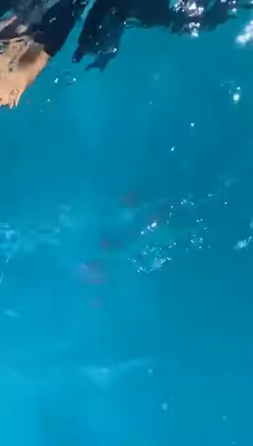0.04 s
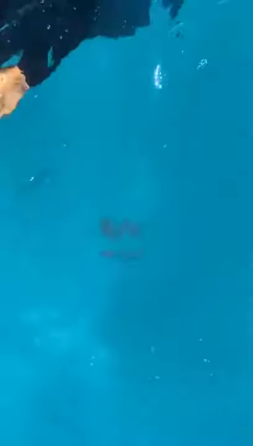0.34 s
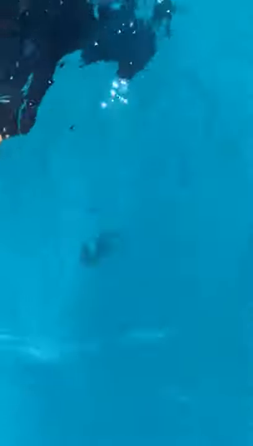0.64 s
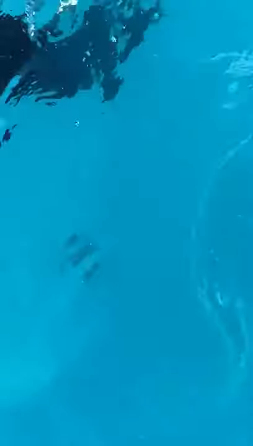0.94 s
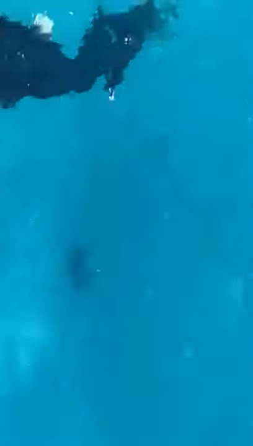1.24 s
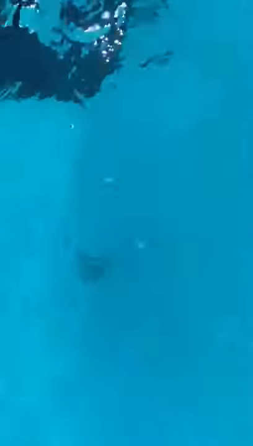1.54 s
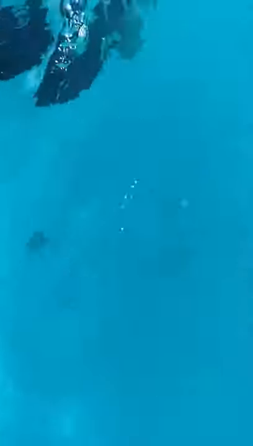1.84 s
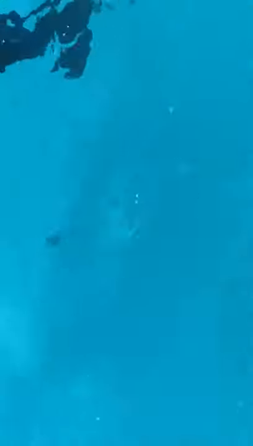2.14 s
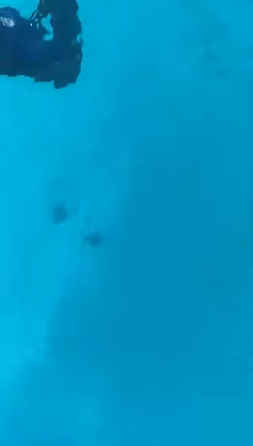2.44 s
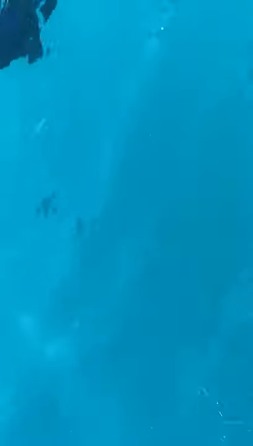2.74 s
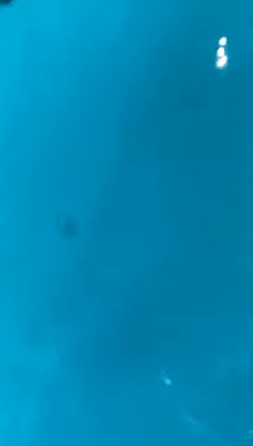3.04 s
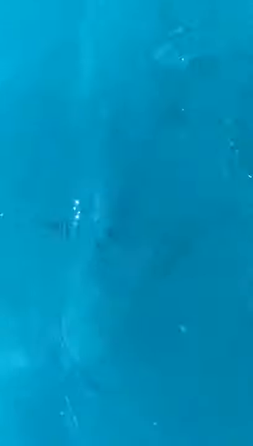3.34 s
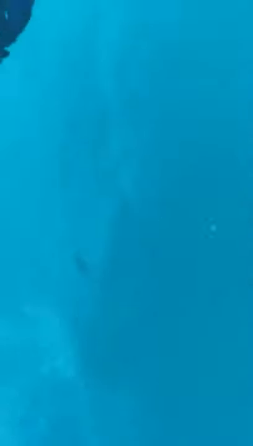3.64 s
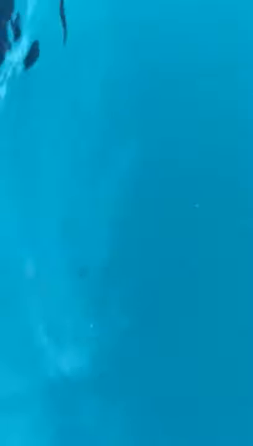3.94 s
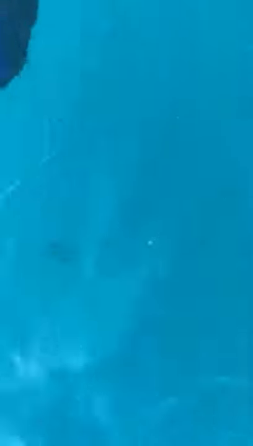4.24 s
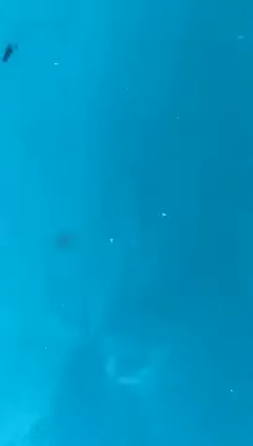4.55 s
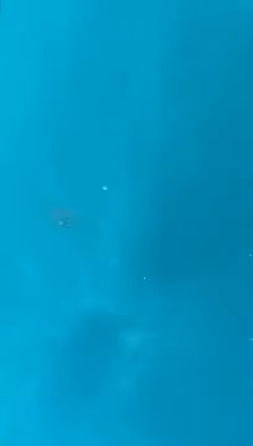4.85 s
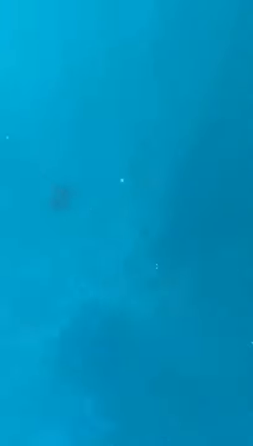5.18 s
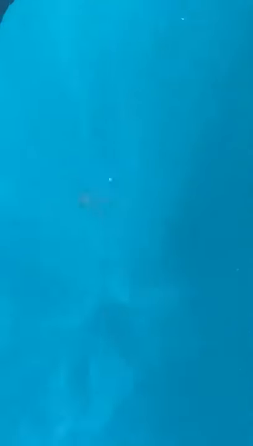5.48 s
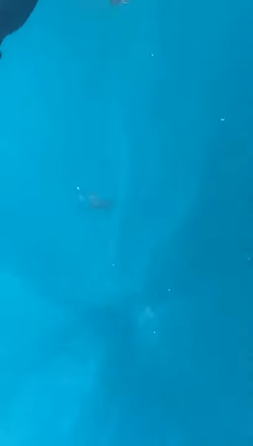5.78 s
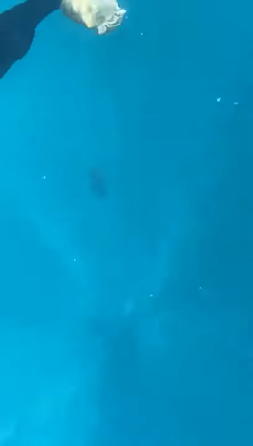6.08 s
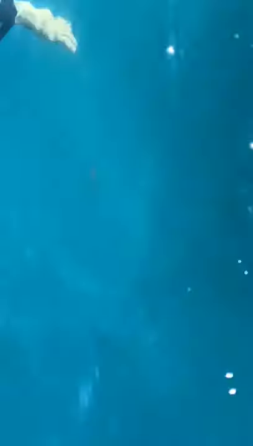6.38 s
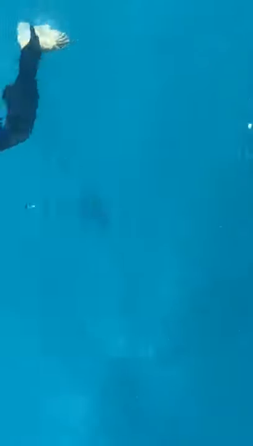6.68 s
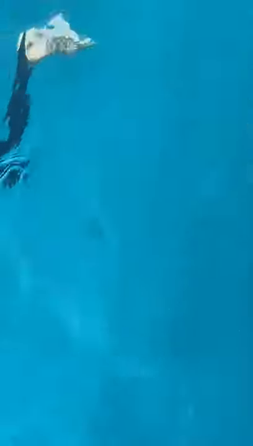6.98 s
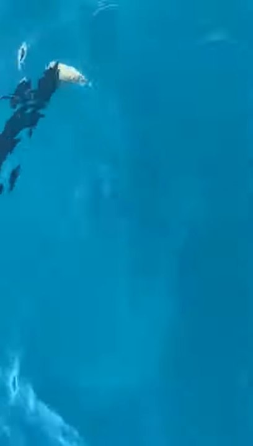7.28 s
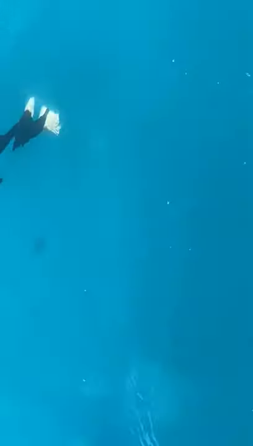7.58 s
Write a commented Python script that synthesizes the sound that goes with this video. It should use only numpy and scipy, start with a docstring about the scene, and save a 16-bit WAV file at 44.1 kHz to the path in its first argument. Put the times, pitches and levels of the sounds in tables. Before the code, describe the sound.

Sea water laps, plops and splashes against a small boat while wind rumbles and thumps on the microphone.

```python
"""Sea water laps at the side of a small boat while wind buffets the microphone.
Each wave folds a cloud of air bubbles under, throws spray and leaves foam that fizzes and crackles
as it dies away. Single bubbles plop and thrown water slaps back on the surface, over a soft wash
and steady low lapping under the hull. Turbulence at the two microphone ports rumbles and thumps;
the hull adds a short, dull reflection."""
import sys
import numpy as np
from scipy import signal
from scipy.fft import rfft, irfft, next_fast_len
from scipy.io import wavfile
from scipy.ndimage import uniform_filter1d

SR = 44100
rng = np.random.default_rng(int(sys.argv[2]) if len(sys.argv) > 2 else 0)


def inscribe(sig):
    """Save sig as 16-bit PCM at rate SR to the path in sys.argv[1].

    A 1-D sig is mono; a 2-D sig holds one channel per row.
    Samples are clipped to [-1, 1] before scaling.
    """
    pcm = np.round(np.clip(np.atleast_2d(sig).T, -1, 1) * 32767)
    wavfile.write(sys.argv[1], SR, pcm.astype(np.int16))


N = 344862

# waves folding against the hull: start_s, length_s, churn_db, small_bubbles_db, spray_db, pitch_hz
WAVE_HITS = [(-.07, 0.33, -46.5, -44.5, -45.5, 1470), (0.038, .14, -25.5, -60, -87, 420),
             (0.598, 0.083, -34.5, -41.5, -48, 590), (0.908, 0.061, -50, -60, -43, 903),
             (1.024, 0.036, -35, -43, -38, 1420), (2.017, 0.15, -52, -62, -51, 855),
             (3.415, 0.12, -25.5, -34.5, -40.5, 456), (3.644, .16, -42, -48, -46.5, 710),
             (3.934, 0.21, -51.5, -51.5, -50, 890), (4.628, 0.088, -63, -44.5, -46.5, 1100),
             (4.707, 0.3, -50.5, -58.5, -58.5, 1640), (6.003, 0.08, -32, -37.5, -39, 453),
             (6.078, 0.079, -33.5, -42.5, -46.5, 1285), (6.16, 0.24, -49.5, -50.5, -54.5, 1266),
             (6.38, 0.068, -52, -45.5, -46.5, 1900), (7.035, 0.081, -61, -49, -43.5, 1500),
             (7.35, 0.12, -38, -43.5, -46.5, 610)]
# thrown water hitting the surface: hit_s, level_db, t60_s, colour_hz
SLAP_HITS = [(0.248, -27.5, 0.064, 2370), (.311, -28.5, 0.043, 2670), (0.571, -21, .014, 6260),
             (.605, -24, 0.012, 2600), (.902, -22, 0.017, 3790), (.938, -13, 0.017, 5200),
             (1.035, -13, 0.011, 3260), (1.171, -26.5, 0.027, 8100), (3.549, -25, .014, 3840),
             (3.679, -25, 0.025, 3350), (3.734, -26.5, 0.025, 3460), (4.156, -18.5, 0.0043, 8040),
             (4.35, -11, 0.007, 6820), (4.446, -27, 0.084, 3530), (5.01, -32.5, 0.02, 3900),
             (6.348, -24, 0.094, 3050), (7.117, -23, .018, 4680), (7.155, -26, 0.036, 2850),
             (7.287, -17, 0.011, 7260)]
# bright EQ of spray and foam: frequency_hz, gain_db
SPRAY_EQ = [(900, -31), (1800, 6), (2700, 5), (4000, 4.5), (5300, 1.5), (6500, 2), (8000, -3), (10000, 3.5),
            (12000, -6)]

CALM_FIZZ_DB = -62  # hiss of calm water, on which the foam builds
PATTER_DB = 3  # depth of the fast flutter in slaps and foam


def waves():
    """A wave folds big bubbles under in glugs that climb as the air breaks up; small ones and spray follow."""
    glug_db, glide_octaves = 2.2, 0.48  # depth of the flutter; climb over a wave's length
    small_bubble_eq = [(600, -17), (1000, 2), (1500, 7.5), (2150, -2.5), (3500, -8.5)]  # frequency_hz, gain_db
    out, t = np.zeros((2, N)), np.arange(N) / SR
    gurgle = bubble_cloud(295.7, 3700, per_s=2800, cycles=21, rise=0.321, pitches=48)
    gurgle = stereo(gurgle + amp(-12) * noise_pair(), side=0.077)
    small = equalise(gurgle, small_bubble_eq)
    spray = stereo(equalise(fine_bubbles() + noise_pair(), SPRAY_EQ), side=0.067)
    spray = unit_rms(spray * amp(glug_db * wobble(size=90)))  # spray lands in separate spatters
    glugs = amp(glug_db * wobble(size=220))
    for start, length, churn_db, small_db, spray_db, hz in WAVE_HITS:
        span = slice(max(int(start * SR), 0), int((start + 2 * length) * SR))
        age = np.maximum(t[span] - start, 0) / length
        sweep_hz = hz * 2 ** (glide_octaves * (age - .5))
        large = levelled(swept_band(gurgle[:, span], sweep_hz, half_width_hz=0.65 * hz), size=1500)
        splash = amp(spray_db) * spray[:, span] + amp(small_db) * small[:, span]
        fold = (1 - np.exp(-age / 0.15)) * np.exp(-age ** 2.4)
        throw = (1 - np.exp(-(age / 0.36) ** 2)) * np.exp(-(age / 0.86) ** 3.7)
        out[:, span] += amp(churn_db + 1) * fold * large + amp(5) * throw * splash
    return out * glugs


def plops():
    """A big bubble ticks as its neck pinches off, rings with a wobble and sheds two smaller bubbles."""
    # single bubbles by the boat: start_s, pitch_hz, level_db, ring_cycles, rise_share
    big_bubbles = [(0.652, 1840, -24.5, 45, 0.24), (0.67, 1012, -17, 55, -0.064),
                   (.752, 2930, -30, 38, 0.45), (0.973, 1615, -23, 21, 0), (1.033, 1610, -11.5, 8, 1),
                   (1.292, 4370, -31, 48, -0.12), (2.109, 2550, -29, 36, 0.031),
                   (2.268, 560, -19, 18, 0.18), (2.492, 1710, -25.5, 9.2, 0.034),
                   (2.578, 2920, -23.5, 12, 0.16), (2.625, 2970, -28.5, 35, 0.1),
                   (3.464, 1353, -25, 79, 0.13), (3.576, 510, -19, 17.5, 0.74),
                   (3.726, 1125, -25.5, 43, 0.4), (4.149, 2140, -26, 40, 0.54),
                   (4.348, 1516, -21.5, 24, 0.33), (4.667, 1297, -19.5, 33, 0.45),
                   (4.98, 1970, -30.5, 34, 0.25), (5.7, 1464, -33, 41, 0.067), (6.132, 734, -18, 28, 0.36),
                   (6.434, 2750, -30, 50, 0.36), (6.978, 2290, -24, 29, 0.13),
                   (7.156, 1140, -12.5, 5.3, 0.36), (7.280, 745, -24.5, 32, 1.35),
                   (7.32, 2295, -28.5, 68, 0.27)]
    shed_db, shed_octaves, shed_within_s = -14, 1.6, .03
    out = np.zeros((2, N))
    for (start, hz, db, cycles, rise), pan_db in zip(big_bubbles, rng.uniform(-1, 1, len(big_bubbles))):
        gain = amp(db + pan_db * np.array([[1], [-1]]))
        ring = bubble(hz, cycles / hz, rise)
        ring *= amp(2.2 * wobble(size=70, count=len(ring)))
        t = np.arange(len(ring)) / SR
        tick_db = -10.5 + 5.5 * np.log2(hz / 1960)  # smaller bubbles tick harder
        tick = amp(tick_db) * rng.standard_normal(len(t)) * np.exp(-t / 0.0019)
        add(out, start, gain * (ring + tick))
        for late, smaller in rng.random((2, 2)):
            shed_hz = hz * 2 ** (shed_octaves * smaller)
            shed = bubble(shed_hz, cycles / shed_hz, rise / 2)
            add(out, start + shed_within_s * late, gain * amp(shed_db) * shed)
    return out


def slaps():
    """Thrown water lands: a quick swell to one sharp crack, then an uneven patter of droplets."""
    out, t = np.zeros((2, N)), np.arange(-600, 3500) / SR
    for hit, db, t60, hz in SLAP_HITS:
        clumps = amp(PATTER_DB * wobble(size=40, count=len(t)))
        droplets = noise_pair(len(t)) * amp(0.44 * rng.standard_normal(len(t)))
        band = signal.butter(1, [hz / 1.9, min(hz * 1.33, SR / 2.5)], "band", fs=SR)
        patter = stereo(signal.lfilter(*band, droplets), side=0.2)
        envelope = np.exp(-np.log(1000) * np.maximum(t, -2.6 * t) / t60)
        crack = np.exp(-((t - .0005) / 0.00029) ** 2)
        add(out, hit + t[0], amp(db - 6) * patter * (envelope * clumps + crack))
    return out


def bubble(hz, t60, rise):
    """Trapped air rings down, its pitch gliding by the share `rise` over t60 as it nears the surface."""
    t = np.arange(int(t60 * SR) + 8) / SR
    turns = hz * (t + rise * t ** 2 / (2 * t60))
    attack = 1 - np.exp(-.7 * hz * t)
    decay = np.exp(-np.log(1000) * (t / t60) ** 1.64)
    return np.sin(2 * np.pi * turns) * decay * attack


def bubble_cloud(low_hz, high_hz, per_s, cycles, rise, pitches):
    """Bubbles of many sizes ring at random times, about per_s a second in each channel."""
    spread_db, candidates = 4, 3000
    birth_chance = 2 * per_s * N / SR / pitches / candidates
    out = np.zeros((2, N))
    for hz in np.geomspace(low_hz, high_hz, pitches):
        ring = bubble(hz, cycles / hz * rng.uniform(0.17, 3.07), rise * rng.uniform(0.33, 2.22))
        when, channel, size, draw = rng.random((4, candidates))
        strength = amp(spread_db * np.minimum(-np.log(size), 4)) * rng.choice([-1, 1], candidates)
        births = np.zeros((2, N))
        births[(2 * channel).astype(int), (when * N).astype(int)] = strength * (draw < birth_chance)
        out += signal.oaconvolve(births, hz * ring[None], axes=1)[:, :N]
    return unit_rms(out)


def fine_bubbles():
    """The dense, wet chatter of the smallest bubbles in spray and foam."""
    return bubble_cloud(1510, 6520, per_s=1800, cycles=14, rise=0.16, pitches=40)


def foam_envelope():
    """How much foam lies on the water, 1 when calm: each wave and slap leaves a patch that dies away."""
    rise_db_per_s, fade_db_per_s = 90, 40.5
    t, power = np.arange(N) / SR, np.ones(N)
    # a patch scales with the energy of the spray or slap: peak_s, level_db
    patches = [(start + length, spray_db + 1.5 + 10 * np.log10(length))
               for start, length, _, _, spray_db, _ in WAVE_HITS]
    patches += [(hit, db - 18 + 10 * np.log10(t60)) for hit, db, t60, _ in SLAP_HITS]
    for peak, db in patches:
        below_peak_db = np.maximum(rise_db_per_s * (peak - t), fade_db_per_s * (t - peak))
        power += amp(db - CALM_FIZZ_DB - below_peak_db) ** 2
    return np.sqrt(power)


def crackle(foam):
    """Droplets tick without a pitch: a few loud ones, and faint ones that thicken and grow with the foam."""
    # the loudest droplets on the surface: start_s, level_db
    loud_drops = [(.7, -20), (1.011, -23), (1.114, -20), (2.063, -26), (2.185, -29), (2.634, -31),
                  (1.848, -28), (3.395, -26), (4.568, -23), (6.836, -31.5)]
    calm_per_s, t60_s = 17, .006
    out, t = np.zeros((2, N)), np.arange(256) / SR
    births = np.flatnonzero(rng.random(N) < calm_per_s * foam / SR)
    faint_db = -55.5 + 17 * np.log10(foam)
    faint_drops = [(i / SR, faint_db[i] + 5 * min(rng.exponential(), 3)) for i in births]
    for start, db in list(loud_drops) + faint_drops:
        add(out, start, amp(db - 60 * t / t60_s) * rng.standard_normal(len(t)))
    return signal.lfilter(*signal.butter(1, [3800, 12000], "band", fs=SR), out)


def wind_and_low_lapping():
    """Turbulence at the ports rumbles, buffets and thumps, over steady low lapping under the hull."""
    # wind strength at the microphone: time_s, level_db
    wind_curve = [(0.0, -40.5), (2.41, -24), (2.44, -23.5), (2.52, -28.5), (4.2, -29), (4.4, -22.5),
                  (5.07, -26), (5.339, -19), (5.441, -34), (5.64, -22.5), (5.772, -44), (6.29, -30),
                  (6.749, -37.5), (7.82, -31)]
    # eddies hitting the microphone: centre_s, peak_db, pitch_hz
    thumps = [(1.451, -13.5, 149), (2.365, -22, 76), (2.445, -11, 98), (3.954, -19.5, 73),
              (4.378, -17, 90.5), (4.521, -9.5, 121), (4.67, -13.5, 134.3), (5.179, -14, 80),
              (5.257, -9, 159), (5.33, -32, 84), (6.664, -19.5, 140)]
    # EQ of the deep rumble: frequency_hz, gain_db
    rumble_eq = [(15, -51), (30, -22), (48, -6.5), (85, 1), (120, -8.5), (200, -15.5), (400, -35.5),
                 (900, -79)]
    # EQ shared by the lapping under the hull and the gusts' buffeting: frequency_hz, gain_db
    low_mid_eq = [(50, -9.5), (110, -5), (160, -2), (250, 1), (400, -9.5), (700, -27), (1500, -45),
                  (4000, -77)]
    gust_db, gust_power = -22.5, 3.4
    wind_db = np.interp(np.arange(N) / SR, *np.transpose(wind_curve))
    # steady low lapping under the hull, joined by wind buffeting that grows steeply near gust_db
    low_mid_gain = amp(-34.5) * np.hypot(1, amp(gust_power * (wind_db - gust_db)))
    eddies, stir = np.zeros(N), np.ones(N)
    t = np.arange(-2205, 2205) / SR
    for centre, db, hz in thumps:
        swell = amp(db) * np.exp(-(t * hz / 0.8) ** 2)
        add(eddies, centre + t[0], swell * np.cos(2 * np.pi * (hz * t + rng.random())))
        add(stir, centre + t[0], 6 * swell)  # an eddy ducks the rumble and lifts the low mids
    rumble = stereo(equalise(noise_pair(), rumble_eq), side=0.067)
    rumble = levelled(rumble, size=4500) / np.sqrt(stir)
    low_mids = stereo(equalise(noise_pair(), low_mid_eq), side=0.11) * amp(2.4 * wobble(size=700))
    return amp(wind_db - 0.56) * rumble + low_mid_gain * stir * levelled(low_mids, size=6000) + eddies


def water_bed(foam):
    """Ripples all around make a soft, gurgling wash; foam chatters over it in clusters and lulls."""
    # EQ of the rippling wash: frequency_hz, gain_db
    wash_eq = [(150, -26), (330, 3.5), (520, 5), (750, -0.5), (1400, -7.5), (2100, -13.5), (2800, -13),
               (4000, -39), (9000, -40)]
    wash_gain, fizz_gain = amp(-43.5) * foam ** 0.23, amp(CALM_FIZZ_DB) * foam
    bubbly = 1 - 1 / foam  # zero on calm water
    gurgle = bubble_cloud(300.2, 3215, per_s=800, cycles=14.6, rise=0.13, pitches=36)
    wash = equalise(amp(-7) * gurgle + noise_pair(), wash_eq) * amp(2.1 * wobble(size=1300))
    chatter = unit_rms(fine_bubbles() * amp(3 * wobble(size=2200)))
    fizz = equalise(bubbly * chatter + noise_pair(), SPRAY_EQ)
    fizz = unit_rms(fizz * amp(PATTER_DB * bubbly * wobble(size=130)))  # fresh foam spits
    lulls = amp(1.8 * wobble(size=4000))
    return wash_gain * stereo(wash, side=0.58) + fizz_gain * lulls * stereo(fizz, side=0.067)


def hull_reflection(x):
    """Short, dull scatter from the hull and the waves, different at each port."""
    echoes_per_s, predelay_s, t60_s = 2000, .002, 0.058
    t = np.arange(6000) / SR
    taps = noise_pair(len(t)) * (rng.random((2, len(t))) < echoes_per_s / SR) * (t > predelay_s)
    taps = signal.lfilter(*signal.butter(1, 4000, fs=SR), taps * np.exp(-np.log(1000) * t / t60_s))
    return signal.oaconvolve(x, taps / np.linalg.norm(taps, axis=1, keepdims=True), axes=1)[:, :N]


def amp(db):
    return 10 ** (np.asarray(db) / 20)


def unit_rms(x):
    return x / np.sqrt(np.mean(x ** 2) + 1e-20)


def noise_pair(count=N):
    return rng.standard_normal((2, count))


def wobble(size, count=N):
    """Smooth random modulation whose lumps last about `size` samples."""
    return unit_rms(uniform_filter1d(uniform_filter1d(rng.standard_normal(count), size), size))


def add(mix, start_s, sound):
    """Mixes a sound in at start_s."""
    part = mix[..., max(round(start_s * SR), 0):][..., :sound.shape[-1]]
    part += sound[..., :part.shape[-1]]


def curve_at(points, hz):
    """Reads a curve along a log-frequency axis."""
    point_hz, value = np.transpose(points)
    return np.interp(np.log(hz + 1), np.log(point_hz + 1), value)


def filtered(x, response):
    """Passes x through a response given as a function of frequency."""
    size = next_fast_len(N + 4096)
    return irfft(rfft(x, size) * response(np.fft.rfftfreq(size, 1 / SR)), size)[..., :N]


def equalise(x, eq):
    """Applies an EQ curve and normalises the result."""
    return unit_rms(filtered(x, lambda hz: amp(curve_at(eq, hz))))


def swept_band(x, hz, half_width_hz):
    """A band-pass that follows a moving pitch."""
    carrier = np.exp(2j * np.pi * np.cumsum(hz) / SR)
    return (carrier * signal.lfilter(*signal.butter(2, half_width_hz, fs=SR), x / carrier)).real


def stereo(pair, side):
    """Two unrelated signals become mid and side."""
    return unit_rms(pair[0] + side * np.array([[1], [-1]]) * pair[1])


def levelled(x, size):
    """Takes the slow swell out of a texture and keeps its grain."""
    return x / np.sqrt(abs(uniform_filter1d((x ** 2).mean(0), size)) + 1e-9)


def scene():
    """Close water and its reflection, mixed with wind, low lapping, wash and crackle."""
    close_water = plops() + slaps() + waves()
    foam = foam_envelope()
    background = wind_and_low_lapping() + water_bed(foam)
    return background + close_water + amp(-12.5) * hull_reflection(close_water) + crackle(foam)


def record(dry):
    """The two microphone ports differ in phase and level; a steep low-pass trims the top."""
    # phase between the ports: frequency_hz, right_lag_rad
    port_phase = [(500, 0), (1900, .2), (2600, .8), (4400, .7), (5400, .1), (6600, 2.9), (8200, 3.35),
                  (9100, 5.5), (10000, 6.3), (12000, 7.4)]
    # balance between the ports: frequency_hz, right_over_left_db
    port_balance = [(100, 0.5), (300, 1.75), (560, 5), (800, 2.5), (1500, 0)]
    cutoff_hz = 12000
    right = filtered(dry[1], lambda hz: np.exp(-1j * curve_at(port_phase, hz)))
    split = np.array([[-.5], [.5]])
    pair = filtered(np.array([dry[0], right]), lambda hz: amp(split * curve_at(port_balance, hz)))
    low_pass = signal.firwin(201, cutoff_hz, window=("kaiser", 8), fs=SR)
    return signal.oaconvolve(pair, low_pass[None], "same")


dry = scene()
out = record(dry)
inscribe(out)
```